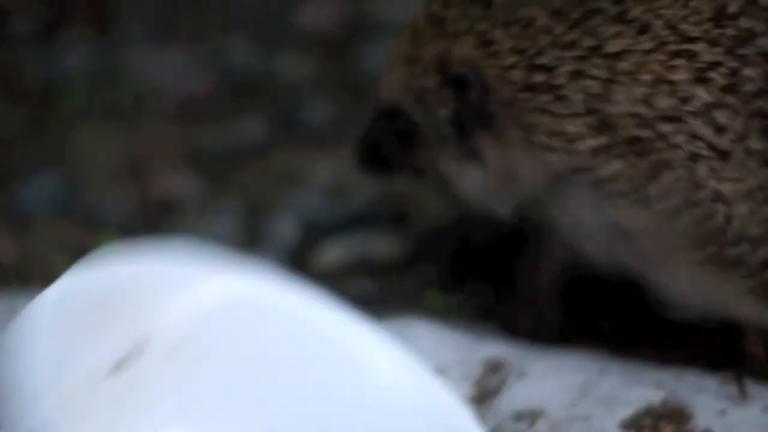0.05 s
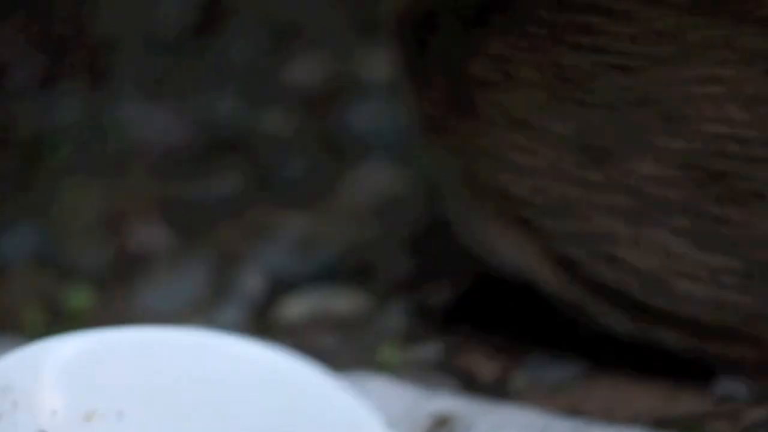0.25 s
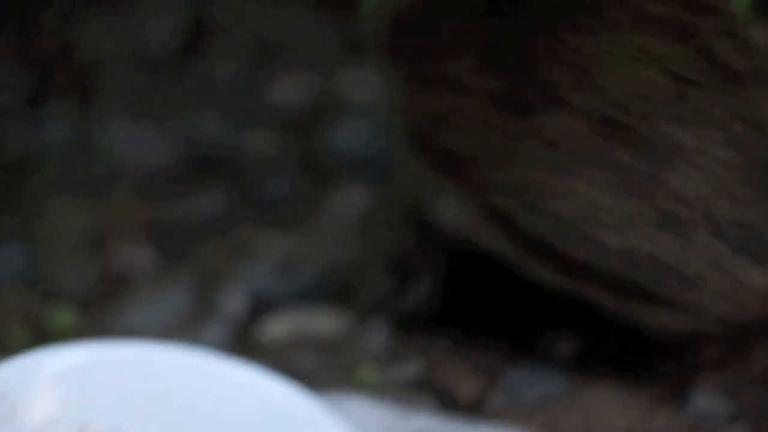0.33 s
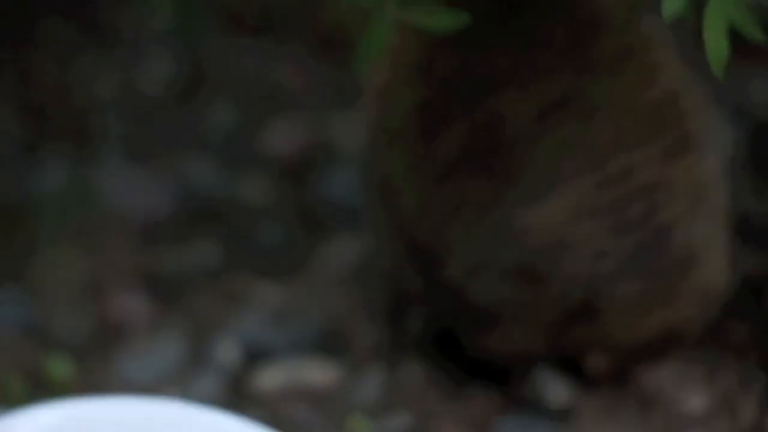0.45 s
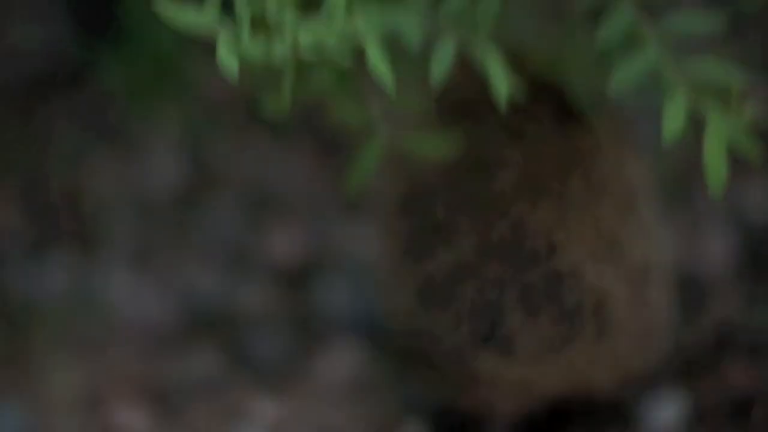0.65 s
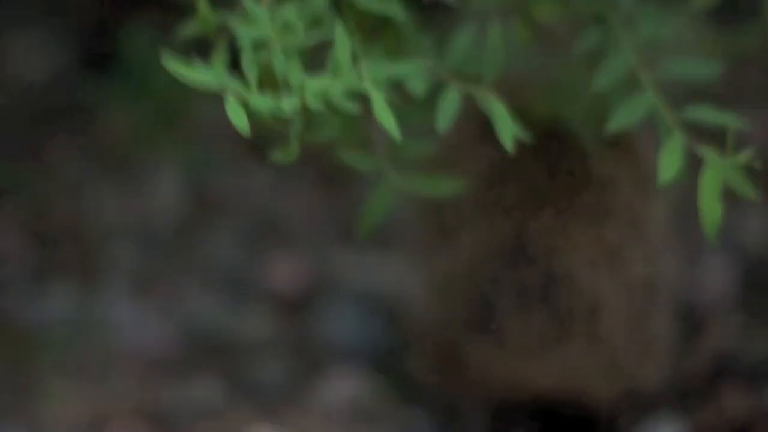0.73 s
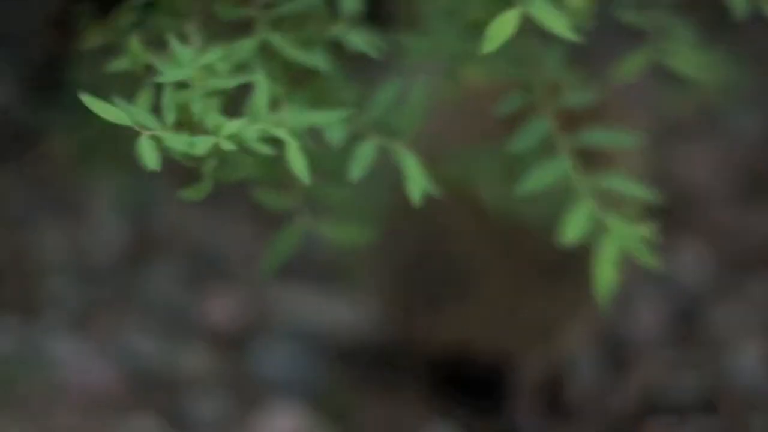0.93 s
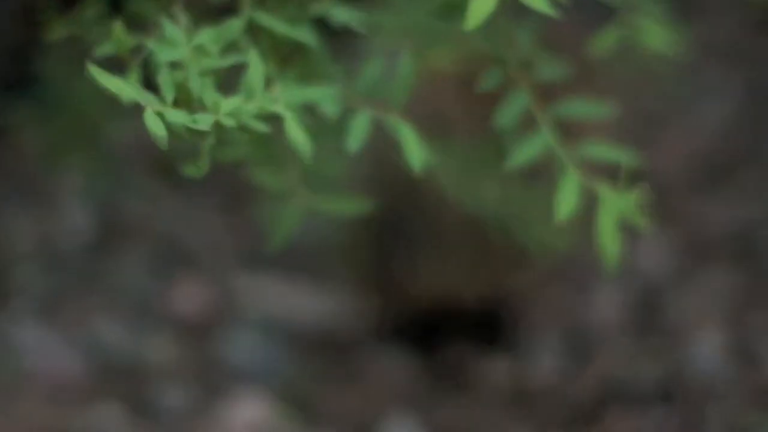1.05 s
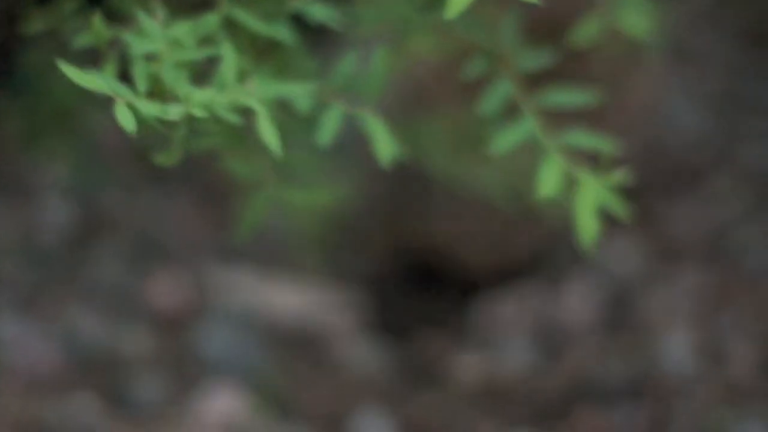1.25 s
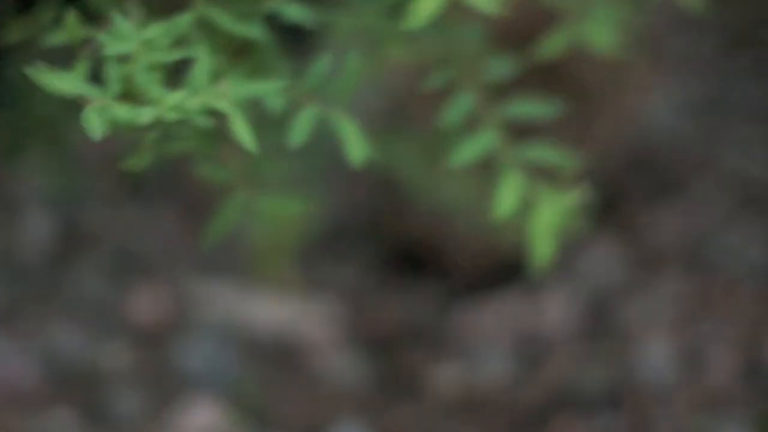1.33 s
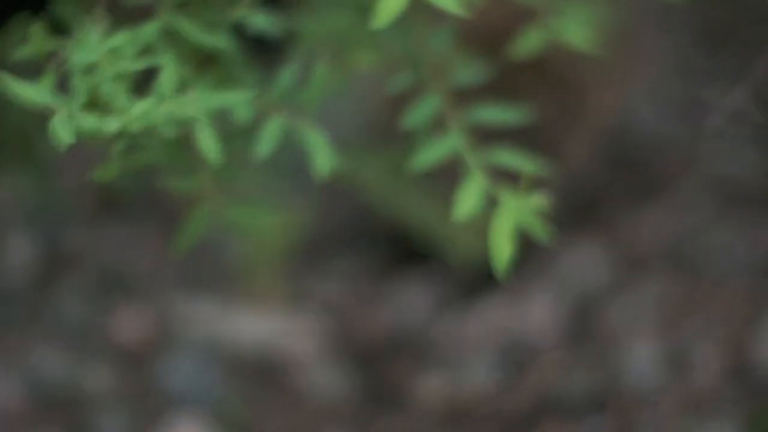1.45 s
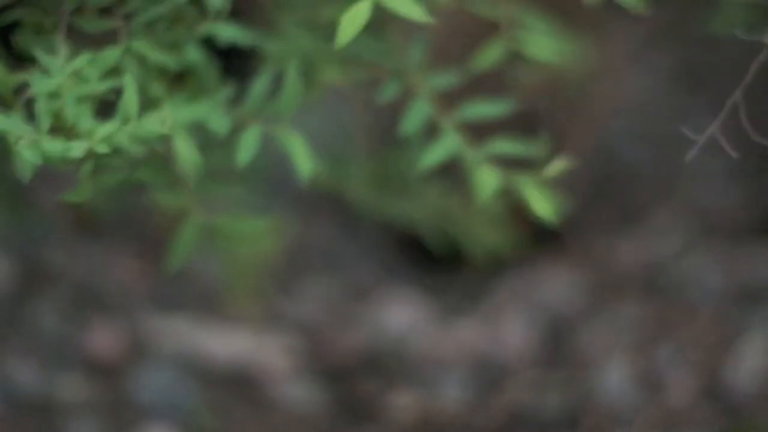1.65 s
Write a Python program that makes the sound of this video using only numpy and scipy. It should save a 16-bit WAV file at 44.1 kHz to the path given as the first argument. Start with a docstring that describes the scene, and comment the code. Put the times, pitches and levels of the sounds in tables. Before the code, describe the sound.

A china bowl hits a stone slab at about 0.2 seconds with a sharp, ringing clink and a quick chatter. It lands again more softly around 0.5 seconds and rattles to rest. From about 0.4 to 1.6 seconds a small animal scurries away, with faint brushes of leaves and a few light pebble clicks. The sound is close, over a soft, steady outdoor hush.

```python
"""China bowl on stone

A tipped china bowl drops back onto a stone slab, chatters and rings, then lands again and rolls to rest.
Each rim contact restarts its ring, over dead clacks, a ping of glaze and faint echoes off nearby stones.
A small animal scurries off, brushing low leaves and clicking pebbles, in a steady outdoor hush.
A close stereo microphone puts a few narrow dips in the tone."""
import sys
import numpy as np
from scipy import signal
from scipy.fft import rfft, irfft
from scipy.io import wavfile
from scipy.ndimage import uniform_filter1d

SR = 44100
rng = np.random.default_rng(int(sys.argv[2]) if len(sys.argv) > 2 else 0)


def put_to_file(sound):
    """Save the sound as 16-bit audio at rate SR, in the file named by the first command-line argument."""
    columns = np.atleast_2d(sound).T  # one column per channel
    safe = np.clip(columns, -1, 1)
    whole_steps = np.round(safe * 32767)
    wavfile.write(sys.argv[1], SR, whole_steps.astype(np.int16))


N = 74970

# Tone of the open air. Each row: frequency in Hz, relative level in dB.
HUSH_COLOUR = [(30, -19.5), (90, -22), (140, -17), (220, -7), (400, -0.5), (900, 1), (1150, 1), (1500, -9),
               (2000, -7), (2800, -7), (4200, -12), (6000, -20), (9000, -25.5), (13800, -28), (16000, -49)]
# Stereo width of the air. Each row: frequency in Hz, side against mid in dB.
HUSH_WIDTH = [(60, 0), (200, -10), (700, -5.5), (1300, -7), (2400, 3.5), (4400, -0.5), (15000, -1.5)]
# Slow swell of the air. Each row: time in seconds, level change in dB.
HUSH_SWELL = [(0, -0.46), (.7, -0.27), (1.0, -0.5), (1.35, 0.75), (1.7, 0.1)]
# The china's modes. Each row: pitch in Hz, level in dB, free ring time to -60 dB in seconds,
# side against mid in dB.
BOWL_MODES = [(1046, -14, .42, -21), (2536, -17.5, .28, -22), (4415, -16, .15, -10), (4535, -28, .06, -10),
              (6259, -32, .12, -22), (6485, -24, .13, -20), (8671, -48, .17, 2), (9893, -46, .15, 2),
              (9920, -45, .15, 2), (10135, -47, .08, 0), (10532, -43, .14, 1), (10860, -42, .09, 0),
              (11130, -44, .1, 0), (11325, -40, .14, 0), (12770, -49, .1, 0), (12885, -42, .12, 0),
              (13720, -54, .1, 0), (14432, -41, .13, -2), (15420, -45, .05, 0)]
# Rim contacts; the spot that touches decides which modes ring. Each row: start in seconds,
# then strength in dB of the first, second, third and upper modes.
RIM_CONTACTS = [(.105, -53, -45, -39, -26), (.2017, -0.5, 2, 1, 1), (.238, -9, -5, -9.5, -1.5),
                (.254, -7, -9.5, -18, -8), (.322, -16, -20, -26, -25.5), (.465, -28, -12.5, -34, -35),
                (.477, -46, -23, -31, -35), (0.485, -15.5, -6.5, -18.5, -40), (0.498, -16, -11, -27, -25.5),
                (0.5098, -12, -5, -22.5, -31.5)]
# The frequencies in Hz at which those four strengths apply.
REGISTER_HZ = [1046, 2536, 4415, 6400]
# The stone stiffens the settling rim. Each row: time in seconds, rise of the lowest mode in Hz.
SETTLE_BEND = [(.47, 0), (.5, 65), (.52, 86), (.537, 141), (.56, 80), (.63, 56)]
# Bowl against slab. Each row: start in seconds, level in dB, decay in seconds,
# treble tilt in dB per octave.
KNOCKS = [(0.2017, -17, 0.0014, 3.5), (0.2028, -7, 0.0019, 0.5), (0.2093, -27, 0.0054, -2.5),
          (.238, -21, 0.0045, 0.5), (0.2419, -30, .004, -6), (0.252, -29.5, 0.0035, -0.5),
          (0.302, -41.5, 0.0094, -5), (0.465, -30.5, 0.0037, -1.5), (.477, -25.5, 0.0022, -1.5),
          (.486, -22.5, .0028, -1.5), (.4935, -31, .003, -2), (.501, -27.5, .0025, -1),
          (0.507, -32, 0.0033, -3), (0.516, -31.5, 0.0046, 0.5)]
# Tone of a knock. Each row: frequency in Hz, relative level in dB.
KNOCK_COLOUR = [(40, -26.5), (135, -28.5), (220, -7), (330, -6.5), (450, 3), (700, 2), (1000, 5),
                (1400, 3.5), (1750, -3), (2850, 0.5), (3500, -8.5), (4400, -9), (5500, -20), (8000, -32.5),
                (16000, -46)]
# Fur and feet brushing leaves. Each row: start in seconds, level in dB, decay in seconds.
RUSTLES = [(.357, -54.5, 0.012), (0.391, -48.5, 0.008), (0.406, -45.5, 0.0056), (.437, -53.5, .012),
           (.528, -49.5, .006), (.708, -50.5, 0.012), (.757, -53, 0.0073), (.844, -47, .014),
           (0.998, -45.5, .015), (1.048, -51.5, .011), (1.099, -49.5, 0.029), (1.149, -56, 0.0038),
           (1.3, -56, 0.021), (1.435, -59, 0.05), (1.536, -45.5, 0.018), (1.556, -48.5, 0.021),
           (1.6, -63, 0.034)]
# Tone of the leaves. Each row: frequency in Hz, relative level in dB.
RUSTLE_COLOUR = [(200, -14), (1000, -4), (2200, 8), (4400, 9.5), (7000, 1.5), (10000, -0.5), (13500, 0.5),
                 (16000, -16)]
# Pebbles shifted by paws. Each row: start in seconds, level in dB, decay in seconds,
# left minus right in dB, treble tilt in dB per octave.
PEBBLES = [(.409, -45, .005, -3, 7), (.434, -34, 0.0026, 14, 2.5), (0.447, -40.5, 0.0047, -8, -2),
           (0.6091, -38.5, 0.0043, 6, 2.5), (.714, -48, 0.0034, -2, 5), (1.22, -41, 0.0033, 1, 1),
           (1.2357, -36.5, 0.0044, 12.5, -2.5), (1.242, -42.5, 0.0045, 4, 0),
           (1.275, -44, 0.0064, -5, -1.5), (1.6234, -38.5, 0.0037, 6.5, 0)]
# Tone of a pebble. Each row: frequency in Hz, relative level in dB.
PEBBLE_COLOUR = [(100, -33), (500, -14), (700, -3), (950, 8.5), (1300, -3), (1900, -4), (3000, -14),
                 (5000, -33), (15000, -44)]
# Dips in the microphone's response. Each row: centre in Hz, width in Hz, depth in dB.
MIC_DIPS = [(604.5, 122, -15), (1373, 234, -28), (2328, 515, -37), (3408, 700, -16)]


def undb(db):
    """Decibels to gain."""
    return 10 ** (np.asarray(db) / 20)


def rms(x):
    """Root mean square."""
    return np.sqrt(np.mean(x ** 2))


def pan(db):
    """Channel gains for a left minus right level."""
    return undb(np.array([[db], [-db]]) / 2)


def stereo(mid, side):
    """Left and right from mid and side."""
    return np.array([mid + side, mid - side])


def since(start):
    """Seconds since a moment, zero before it."""
    return np.maximum(np.arange(N) / SR - start, 0)


def colour(x, points, tilt_db=0, keep_power=True):
    """Causal EQ through (Hz, dB) points, tilted per octave above ten times the lowest frequency."""
    hz, db = np.array(points, float).T
    octave = np.log2(np.maximum(np.arange(N + 1) * SR / (2 * N), 20))
    treble_octaves = np.maximum(octave - np.log2(hz.min() * 10), 0)
    gain = undb(np.interp(octave, np.log2(hz), db) + tilt_db * treble_octaves)
    if keep_power:
        gain = gain / rms(gain)
    cepstrum = irfft(np.log(gain))
    cepstrum[1:N] *= 2  # fold to minimum phase, so nothing rings ahead of a hit
    cepstrum[N + 1:] = 0
    response = np.exp(rfft(cepstrum))
    return irfft(rfft(x, 2 * N) * response)[..., :N]


def wobble(per_s):
    """Glides between random levels, per_s of them a second; spread near 1."""
    hold = int(SR / per_s)
    steps = np.repeat(rng.standard_normal(N // hold + 1), hold)
    return uniform_filter1d(steps, hold)[:N]


def crunch(start, decay):
    """A dying burst of noise, with start and decay in seconds."""
    age = since(start)
    return (age > 0) * np.exp(-age / decay) * rng.standard_normal(N)


def impact(start, decay):
    """A hard contact: one sharp snap followed by gritty micro-contacts."""
    snap, grit = .8, .6
    force = grit * crunch(start, decay)
    force[int(start * SR)] += snap * np.sqrt(decay * SR / 2)
    return force


def hush():
    """A bed of distant outdoor noise, narrow in the low mids and wide in the treble."""
    level_db, flicker_db = -50, .43
    mid, side = colour(rng.standard_normal((2, N)), HUSH_COLOUR)
    side = colour(side, HUSH_WIDTH, keep_power=False)
    swell_db = np.interp(since(0), *np.array(HUSH_SWELL).T) + flicker_db * wobble(per_s=11.84)
    return stereo(mid, side) * undb(level_db + swell_db)


def bowl():
    """Each rim contact takes over from the last ring; settling bends the low modes up and chokes them."""
    contact_s, flutter_db = .00097, 2.7
    stiffen_power, damping_per_hz = 1.34, .32
    t = since(0)
    lowest_hz = BOWL_MODES[0][0]
    rise_hz = np.interp(t, *np.array(SETTLE_BEND).T)
    fade_in = [1 - np.exp(-since(start) / contact_s) for start, *_ in RIM_CONTACTS] + [0]
    out = 0
    for hz, db, t60, side_db in BOWL_MODES:
        bend_hz = rise_hz * (lowest_hz / hz) ** stiffen_power
        damping = np.log(1000) / t60 + damping_per_hz * bend_hz
        path = np.cumsum(2j * np.pi * (hz + bend_hz) - damping) / SR  # running phase and decay
        ring = 0
        for k, (start, *strengths) in enumerate(RIM_CONTACTS):
            strength_db = np.interp(np.log(hz), np.log(REGISTER_HZ), strengths)
            crossfade = fade_in[k] * (1 - fade_in[k + 1])
            swing = np.exp((t > start) * (path - path[int(start * SR)]))
            ring += undb(db + strength_db) * crossfade * swing
        ring *= undb(flutter_db * wobble(per_s=70))  # the rocking bowl makes each mode flutter
        out += stereo(ring.imag, undb(side_db) * ring.real)
    return out * pan(db=-1.7)


def echoes(clink):
    """Faint, quickly fading reflections off the surrounding stones widen the bowl."""
    response = crunch(start=.004, decay=.017)
    response /= np.sqrt(np.sum(response ** 2))
    side = signal.fftconvolve(clink.mean(axis=0), response)[:N]
    return stereo(0, undb(-14.5) * side)


def knocks():
    """Dead clacks on the slab, each with a short scatter off the ground."""
    scatter_db, scatter_s, side_db = -25.5, .031, -17.5
    out = 0
    for start, db, decay, tilt_db in KNOCKS:
        mid = impact(start, decay) + undb(scatter_db) * crunch(start, scatter_s)
        side = undb(side_db) * crunch(start, decay)
        out += undb(db) * colour(stereo(mid, side), KNOCK_COLOUR, tilt_db)
    return out


def glaze_ping():
    """A very short, bright ping of glaze on grit as the bowl lands."""
    start_s, level_db, hz, decay_cycles = .202, -18.5, 10870, 7.4
    cycles = since(start_s) * hz
    ping = (cycles > 0) * undb(level_db) * np.exp(2j * np.pi * cycles - cycles / decay_cycles)
    return stereo(ping.imag, ping.real)


def rustles():
    """Wide swishes of fine leaf grains, leaning right; longer ones swell more slowly."""
    rise_share, scatter_db = .57, 4.5
    brush = 0
    for start, db, decay in RUSTLES:
        rise_s = rise_share * decay
        attack = np.minimum(since(start) / rise_s, 1)
        brush += undb(db) * attack * np.exp(-since(start + rise_s) / decay)
    grains = rng.standard_normal((2, N)) * undb(scatter_db * wobble(per_s=2000))
    return colour(brush * grains / rms(grains), RUSTLE_COLOUR) * pan(db=-4.5)


def pebbles():
    """Small clicks of stones under the paws, each with its own level, pan and brightness."""
    out = 0
    for start, db, decay, pan_db, tilt_db in PEBBLES:
        click = colour(impact(start, decay), PEBBLE_COLOUR, tilt_db)
        out += undb(db) * pan(pan_db) * click
    return out


def scene():
    """The mix: bowl on stone, the fleeing animal and the open air."""
    clink = bowl() + knocks() + glaze_ping()
    return clink + echoes(clink) + pebbles() + rustles() + hush()


def record(dry):
    """The microphone notches a few bands, and a steep low-pass cuts the very top."""
    top_hz = 15800
    for hz, width_hz, depth_db in MIC_DIPS:
        notched = signal.lfilter(*signal.iirnotch(hz, hz / width_hz, fs=SR), dry)
        dry = notched + undb(depth_db) * (dry - notched)
    low_pass = signal.ellip(10, .2, 80, top_hz, fs=SR, output="sos")
    return signal.sosfilt(low_pass, dry)


dry = scene()
out = record(dry)
put_to_file(out)
```